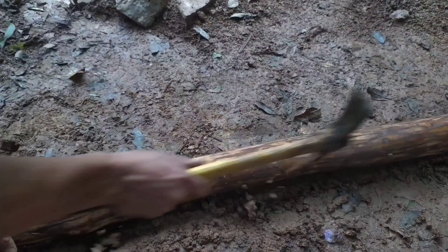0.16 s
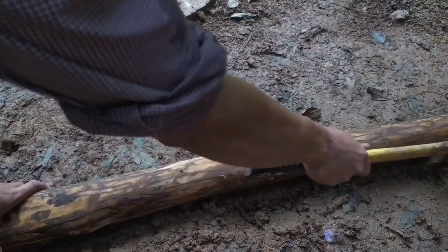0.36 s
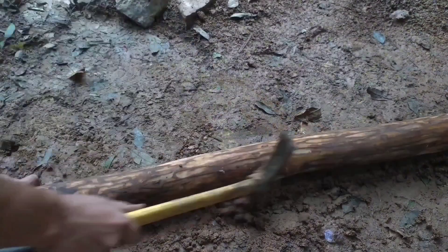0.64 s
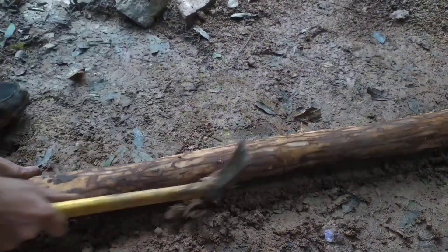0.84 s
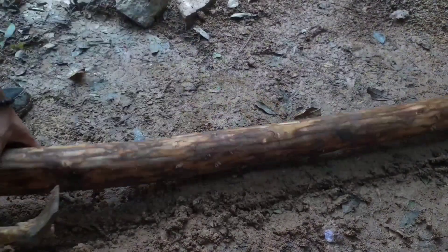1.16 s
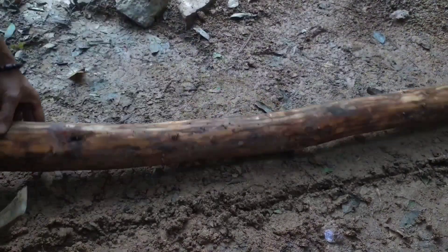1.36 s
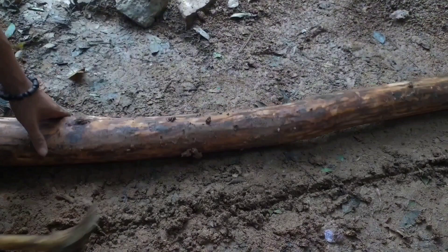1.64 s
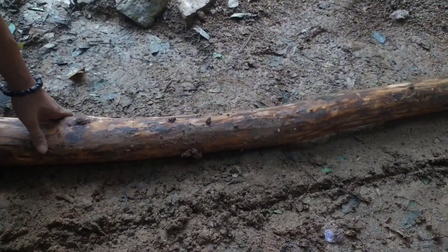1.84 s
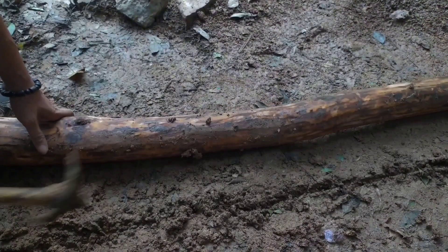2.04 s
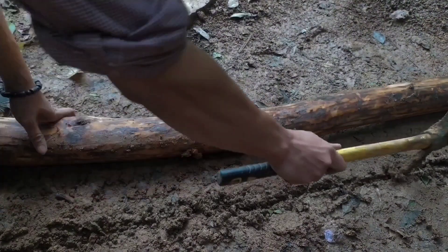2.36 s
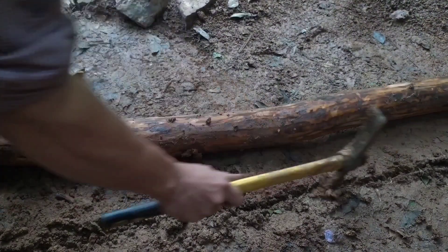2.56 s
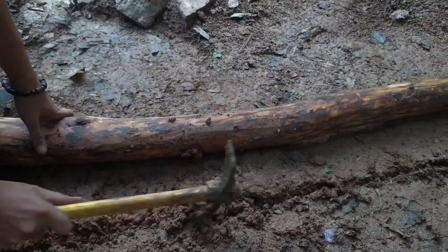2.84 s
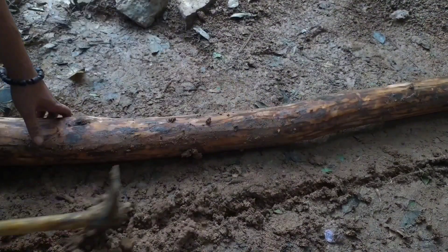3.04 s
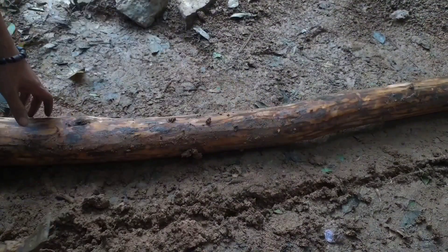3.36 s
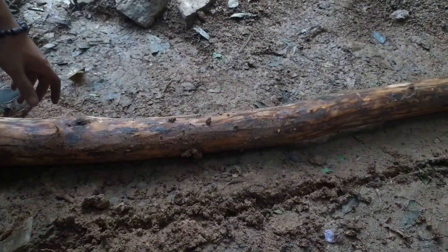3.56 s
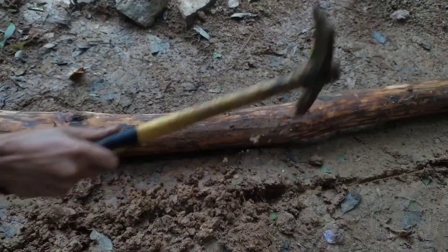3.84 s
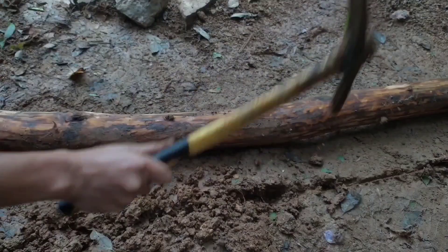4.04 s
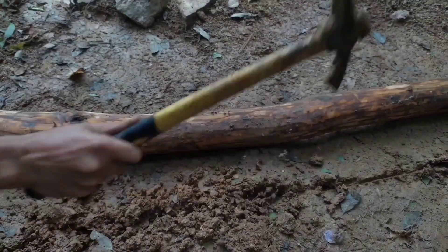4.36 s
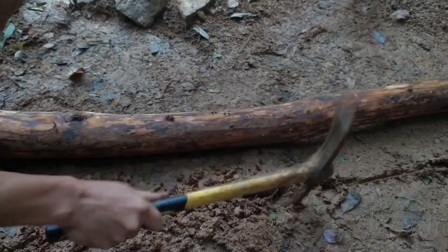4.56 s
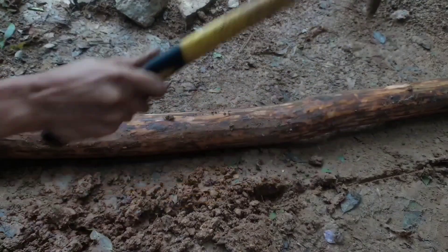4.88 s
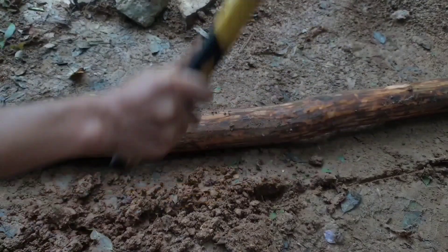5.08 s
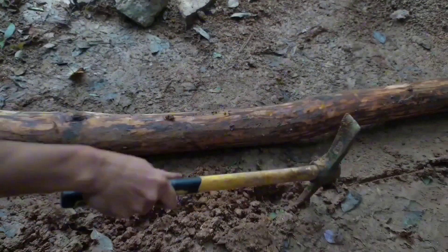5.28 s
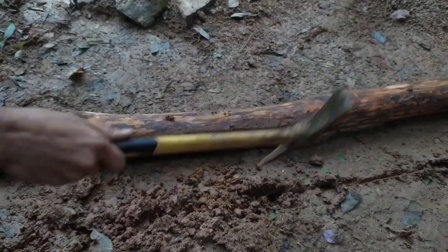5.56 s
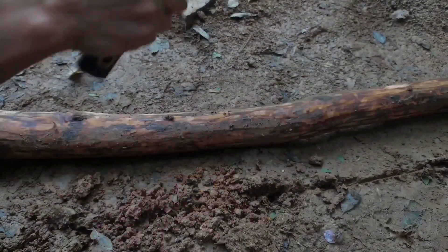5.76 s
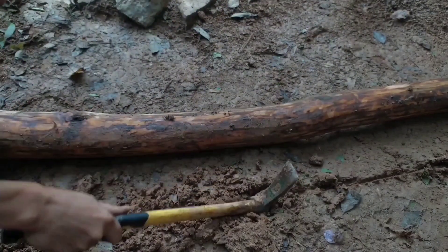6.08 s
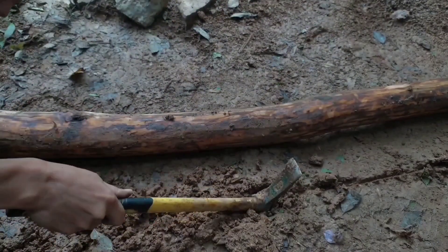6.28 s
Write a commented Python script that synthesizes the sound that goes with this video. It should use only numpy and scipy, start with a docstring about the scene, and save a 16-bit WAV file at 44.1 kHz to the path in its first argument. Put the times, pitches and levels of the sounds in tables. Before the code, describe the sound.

Under a soft cicada drone, a hoe rasps through loose earth and pebbles before striking the ground four times, close and hard.

```python
"""Cicadas drone throughout over a faint forest hush, their tymbals blurred into narrow bands.
For the first 3.6 s a small hoe scrapes loose soil along a log: grit rasps, sand hisses, pebbles click,
clods drop, and at 1.5 s the log settles. From 4.1 to 6 s the hoe chops four times into stony ground,
close by: each chop is a gritty crack and a thud, answered by a short, low boom from the surroundings.
One last faint scrape follows at 6.3 s."""
import sys
import numpy as np
from scipy import signal
from scipy.fft import rfft, irfft
from scipy.io import wavfile
from scipy.ndimage import uniform_filter1d

SR = 44100
rng = np.random.default_rng(int(sys.argv[2]) if len(sys.argv) > 2 else 0)


def log_audio(samples):
    """Write samples as a 16-bit WAV file to the path given in sys.argv[1]."""
    # one column per channel
    frames = np.atleast_2d(samples).T
    # limit to full scale, then quantise
    limited = np.clip(frames, -1, 1)
    pcm = np.round(limited * 32767).astype(np.int16)
    wavfile.write(sys.argv[1], SR, pcm)


N = 282681

# blade impacts, one or more per chop: start_s, edge_db, crunch_db, crunch_decay_s, thud_db,
# thud_pitch_ratio, boom_db, stone_hz, stone_db, left_right_db
IMPACTS = [(4.083, -9.5, -12.5, .002, -33, 1.3, -37, 2775, -15, -8),
           (4.096, -15, -10.5, 0.0012, -14, 1.3, -28, 2218, -18, -2),
           (4.1, -9.5, -15, 0.0022, -16, 1.4, -10.5, 1080, -12.5, 8),
           (4.5738, -5, -9, 0.002, -3, 1.0, -1, 1290, -5, 1),
           (5.1736, -2.5, -15.5, 0.0061, -4.5, .98, 2, 1996, -6.5, 3),
           (5.3448, -32, -36, 0.0044, -41.5, 0.82, -24, 2070, -34, -5),
           (6.0108, -3.5, -11.5, 0.0036, -13, 1, -20.5, 1560, -21, 7.5),
           (6.0220, -20, -21, 0.0013, -24, 0.92, -21, 1912, -25, -7.5),
           (6.026, -29.5, -10, 0.0011, -11.5, 1.0, -7, 2633, -22, -10)]
# stereo image of scrapes and bumps: freq_hz, left_right_db, left_lead_rad
SOIL_IMAGE = [(98.7, -14, 2), (450, -0.5, 0.5), (1250, -4.5, 1.6), (2000, -7, -1.5), (2820, -12.5, -5.5),
              (4750, 0, -1.5), (8820, -7, -2), (14400, 2.5, 3)]


def chops(crunch_lag_s=.0007, thud_lag_s=.0017, soil_give_s=.00044):
    """The edge ticks on grit, crunches through it, and the earth stops the head with a thud and a boom."""
    # spectra of steel meeting grit and of crushed grit: freq_hz, density_db
    edge_spectrum = [(1000, -20.5), (2500, -1.5), (4000, -1.5), (5400, -7.5), (6900, -2.5), (8400, 1),
                     (9600, -5.5), (11000, -15), (13000, -19.5), (14800, -17), (16000, -32)]
    crunch_spectrum = [(100, -14.5), (500, -4), (900, -7.5), (1600, 5), (2700, 0.5), (3400, -2.5),
                       (4200, -22), (5500, -16.5), (9000, -31.5), (16000, -39.5)]
    # packed earth: pitch_hz, level_db, t60_s
    earth_modes = [(149, -20.5, 0.073), (238.8, -8.5, .033), (342.4, -6.5, 0.029), (497, 5.5, 0.015),
                   (647, -8, 0.027), (800, -14, 0.042), (1360, -17.5, 0.0069)]
    # stereo image: freq_hz, left_right_db, left_lead_rad
    chop_image = [(100, -3, 0.5), (450, 1.5, 0.5), (1417, 0.5, 0.5), (2800, -4, 2), (4300, 0, 4),
                  (5700, -3, 4.5), (9000, -2, 9), (15000, -1, 8)]
    out, t = np.zeros((2, N)), np.arange(SR // 2) / SR
    for s, edge_db, crunch_db, decay_s, thud_db, ratio, boom_db, stone_hz, stone_db, side_db in IMPACTS:
        tick = amp(edge_db) * colour(burst(decay_s=.0013, rise_s=.00022), edge_spectrum)
        add(out, s, pan(side_db) * tick)
        crunch = amp(crunch_db) * colour(burst(decay_s, rise_s=.00055), crunch_spectrum)
        stone = ring(stone_hz, stone_db, t60_s=.021)
        add(out, s + crunch_lag_s, pan(side_db) * (crunch + stone))
        thud = sum(ring(hz * ratio, db + thud_db, t60_s) for hz, db, t60_s in earth_modes)
        add(out, s + thud_lag_s, -thud * (1 - np.exp(-t / soil_give_s)))
        add(out, s, amp(boom_db) * boom())
    return stereo(blade(out, ring_db=-22), chop_image)


def boom(size=22050):
    """The low, drooping answer of the surroundings to a blow on the ground."""
    # low resonances: pitch_hz, level_db, t60_s, delay_s, swell_s, left_right_db
    boom_modes = [(77, -33, .33, 0.006, 0.015, -13), (81, -22.5, 0.065, 0.0064, 0.0036, 3),
                  (142.4, 0.5, .075, 0.0066, 0.018, -3.5), (167, -46, 0.46, .01, .015, -1)]
    out, t = np.zeros((2, size)), np.arange(size) / SR
    for hz, db, t60_s, delay_s, swell_s, side_db in boom_modes:
        onset = 1 - np.exp(-(t / swell_s) ** 2)
        add(out, delay_s, pan(side_db) * ring(hz, db, t60_s, sag=.25) * onset)
    return out


def blade(x, ring_db):
    """Adds the faint ring of the steel to whatever touches it."""
    # steel blade: pitch_hz, level_db, t60_s
    steel_modes = [(1900, -39.5, 0.028), (3080, -39, 0.034), (3016, -24.5, .04), (6870, -32.5, 0.034),
                   (7300, -37.5, .03), (8500, -38.5, .05)]
    return x + amp(ring_db) * convolve(x, sum(ring(*mode) for mode in steel_modes))


def scraping(clod_lag_s=.0053):
    """Dragged or thrown crumbs: grit rasps, sand runs earlier and trickles on, clods tumble behind."""
    # strokes through loose soil: start_s, swell_s, settle_s, length_s, level_db,
    # clods_relative_db, sand_relative_db, hum_db
    strokes = [(0.0, 0.0056, 0.031, 0.17, -44, -2, 1.5, -42), (0.253, .14, 0.14, .2, -55, -7, 2.5, -61.5),
               (0.438, 0.089, 0.032, 0.14, -40, -10.5, 1, -54),
               (0.592, .011, 0.027, 0.048, -37.5, -18, 0.5, -57),
               (0.617, 0.046, 0.082, 0.15, -52, -2, -1.5, -51), (0.781, 0.14, 0.076, 0.31, -43, -2, 3, -47),
               (1.116, 0.03, 0.36, 0.33, -61, -6, 2.5, -73), (1.446, .01, 0.047, .11, -52, 1.5, 3.5, -49.5),
               (1.644, 0.044, 0.023, 0.12, -47, 1, 5.5, -54), (1.761, 0.02, 0.075, .15, -55, -8, 4.5, -59),
               (2.342, 0.011, 0.022, 0.11, -36.5, -12.5, -4, -53.5),
               (2.395, 0.087, 0.59, 0.8, -56, -11.5, 3, -61),
               (2.559, .018, 0.042, 0.085, -44, -5, -3.5, -49.5),
               (2.697, 0.032, 0.02, 0.053, -56.5, -1, -3, -52),
               (2.932, .075, 0.074, 0.11, -45.5, -4.5, -0.5, -54),
               (3.041, 0.059, 0.078, .15, -47, -4.5, 2.5, -49.5),
               (3.477, 0.064, 0.058, 0.12, -63.5, -8.5, 9, -68),
               (5.296, .05, .015, 0.069, -45.5, -2, 2, -42), (6.33, 0.049, 0.089, .2, -52, -7, -3, -67)]
    # spectra by crumb size: freq_hz, density_db
    grit_spectrum = [(300, -16), (800, -3.5), (1200, -3.5), (1800, 2.5), (2400, 0.5), (2950, 2),
                     (3600, -1.5), (5000, 3.5), (6200, 6.5), (9000, -23.5)]
    sand_spectrum = [(3000, -35.5), (5500, -1), (7000, 2), (8100, 3.5), (9300, -8), (10500, -17.5),
                     (12500, -24), (15000, -23), (16000, -44.5)]
    clod_spectrum = [(30, -15.5), (80, -12), (120, 2), (190, 6.5), (330, -3.5), (600, -6.5), (1000, -6.5),
                     (2000, -21.5)]
    clods, grit, sand, hum = np.zeros((4, N))
    for s, swell_s, settle_s, length_s, db, clods_db, sand_db, hum_db in strokes:
        grit += amp(db) * push(s, swell_s, settle_s, length_s)
        sand += amp(db + sand_db) * push(s, swell_s, settle_s * 1.1, length_s, power=1.1)
        clods += amp(db + clods_db) * push(s + clod_lag_s, swell_s, settle_s * 1.35, length_s)
        add(hum, s + swell_s, amp(hum_db) * ground_hum())
    crackle = grains(rate_per_s=850, spread_db=4.8, rub=.28) * clumps(depth_db=1.8)
    rasp = amp(3) * colour(crackle * (grit + debris() + spray()), grit_spectrum)
    hiss = amp(2.5) * colour(crackle * (sand + spray()), sand_spectrum)
    rumble = amp(1) * colour(crackle * (clods + debris()), clod_spectrum)
    soil = rasp + hiss + rumble + pebbles()
    return stereo(blade(soil[None], ring_db=-28.5) + hum, SOIL_IMAGE)


def push(start_s, swell_s, settle_s, length_s=1, power=1.3, lift_s=.0066):
    """Stroke envelope: builds as soil piles up, eases as it gives, ends as the blade lifts."""
    t = np.arange(N) / SR - start_s
    contact = .5 - .5 * np.tanh((t - length_s) / (2 * lift_s))
    return contact * np.clip(t / swell_s, 0, 1) ** power * np.exp(-np.maximum(t - swell_s, 0) / settle_s)


def grains(rate_per_s, spread_db, rub, bands=9):
    """Crumbs of each size crackle unevenly in their own octave, over a smooth rub."""
    octave = np.log2(np.clip(np.fft.rfftfreq(N, 1 / SR), 60, 15360) / 60)
    spectrum = 0
    for k in range(bands):
        strength = amp(spread_db * np.minimum(rng.exponential(1, N), 3.5))
        clicks = strength * rng.choice([-1, 1], N) * (rng.random(N) < rate_per_s / SR)
        spectrum += rfft(unit(clicks)) * np.cos(np.pi / 2 * np.clip(octave - k, -1, 1))
    return unit(unit(irfft(spectrum, N)) + rub * rng.standard_normal(N))


def clumps(depth_db):
    """Soil breaks away in lumps, so the crackle comes in flurries."""
    return unit(amp(depth_db * unit(uniform_filter1d(rng.standard_normal(N), size=300))))


def spray(relative_db=-35):
    """Envelope of crumbs bursting from each impact; follows the crunch level."""
    return sum(amp(relative_db + crunch_db) * push(s, swell_s=.012, settle_s=.016, power=.92)
               for s, _, crunch_db, *_ in IMPACTS)


def debris(relative_db=-56):
    """Envelope of thrown crumbs landing; a heavier blow throws more."""
    return sum(amp(relative_db + thud_db) * push(s, swell_s=.12, settle_s=.042, power=1.7)
               for s, _, _, _, thud_db, *_ in IMPACTS)


def pebbles():
    """Pebbles hit the blade with a bright tick and a duller clack."""
    # pebble hits: start_s, tick_db, clack_db
    hits = [(0.0167, -19.5, -26.5), (0.0248, -22, -25.5), (0.4924, -25, -43.5), (0.6065, -30, -25.5),
            (.651, -25.5, -39), (0.658, -22, -33.5), (0.865, -32.5, -41), (0.9059, -36.5, -29.5),
            (0.934, -40, -28), (1.266, -37, -51), (1.494, -38, -51.5), (1.657, -34.5, -59),
            (2.3452, -22.5, -34.5), (2.3758, -28, -32), (2.508, -29, -44), (2.5228, -37, -36),
            (2.6342, -30.5, -58), (2.691, -34, -32.5), (2.7235, -31.5, -33.5), (2.918, -35, -43.5),
            (3.026, -39.5, -36), (5.4291, -29, -37)]
    # spectra of a hit: freq_hz, density_db
    tick_spectrum = [(2000, -21.5), (4500, 0), (6500, -0.5), (8200, 9.5), (10500, -16), (15000, -11.5),
                     (16000, -71)]
    clack_spectrum = [(150, -14.5), (700, -11.5), (1700, -5.5), (2900, 6), (3700, 2), (6000, -10.5),
                      (12000, -43)]
    out = np.zeros(N)
    for s, tick_db, clack_db in hits:
        click = burst(decay_s=.002, rise_s=.00014)
        add(out, s, amp(tick_db) * colour(click, tick_spectrum))
        add(out, s, amp(clack_db) * colour(click, clack_spectrum))
    return out


def ground_hum(swell_s=.014, spread_db=2.5, size=22050):
    """The ground hums briefly under a stroke; each spot favours other tones."""
    # ground tones: pitch_hz, level_db, t60_s
    ground_modes = [(78, -2, 0.39), (107.5, -0.5, .2), (134.8, -5, 0.12), (192.3, 5, 0.072)]
    tones = sum(ring(hz, db + spread_db * rng.standard_normal(), t60_s) for hz, db, t60_s in ground_modes)
    return tones * (1 - np.exp(-np.arange(size) / SR / swell_s))


def bumps():
    """Clods drop with a dull pat; the rolled log settles softly."""
    # falling clods: start_s, level_db, pitch_hz
    clod_falls = [(.37, -39.5, 324), (0.475, -37.5, 343), (0.861, -32.5, 417), (3.317, -47, 647),
                  (4.247, -53, 550), (4.688, -44, 445), (4.868, -52, 522)]
    # log bumps: start_s, level_db
    log_bumps = [(1.459, -49), (1.478, -39)]
    # log on earth: pitch_hz, level_db, t60_s
    log_modes = [(47.27, -1.5, 0.1), (99.5, -4.5, 0.056), (166, -1.5, 0.096), (231, -6, .025),
                 (596, -4, .018)]
    out = np.zeros(N)
    for s, db, hz in clod_falls:
        add(out, s, ring(hz, db, t60_s=.026))
    for s, db in log_bumps:
        add(out, s, amp(db) * sum(ring(*mode) for mode in log_modes))
    return stereo(out[None], SOIL_IMAGE)


def surroundings(x, near_db=-7.5, far_db=-14, move_s=.06, patches=5):
    """Rough ground scatters sound, differently as the blade moves; far surfaces return a short tail."""
    # decay of near scatter and far echo: freq_hz, t60_s
    near_decay = [(100, 0.0023), (900, 0.0096), (2500, 0.012), (15000, 0.0077)]
    far_decay = [(100, 0.11), (500, 0.12), (1300, 0.11), (2600, 0.15), (8000, 0.24), (11000, .13),
                 (15000, .15)]
    place = np.arange(N) / SR / move_s
    near = 0
    for k in range(patches):
        crossfade = np.cos(np.pi / 2 * np.clip((place - k + 1) % patches - 1, -1, 1))
        near += convolve(x * crossfade, reflections(near_decay, build_s=.0011))
    far = convolve(x, pan(-.26) * reflections(far_decay, build_s=.0025))
    return amp(near_db) * near + amp(far_db) * far


def reflections(decay, build_s, rate_per_s=6000, size=16384):
    """Sparse echoes, different left and right, build up and die band by band."""
    taps = rng.standard_normal((2, size)) * (rng.random((2, size)) < rate_per_s / SR)
    hz, t, bands = signal.stft(taps, SR, nperseg=64)
    bands = bands * amp(-60 * t / lookup(decay, hz)[:, None])
    tail = signal.istft(bands, SR)[1][:, :size]
    tail *= 1 - np.exp(-(np.arange(size) / SR / build_s) ** 2)
    return tail / np.linalg.norm(tail, axis=1, keepdims=True)


def cicadas(fade_db_per_s=-.19):
    """Many distant tymbals blur into narrow bands, most throbbing at an unsteady rate."""
    # cicada groups: centre_hz, half_width_hz, level_db, pulse_hz, depth_ratio
    groups = [(4744, 320, -55.5, 36, 0.2), (6153, 283, -52, 34, 0.1), (6736, 120, -63.5, 710, 0.4),
              (7480, 350, -63.5, 141, 0), (8920, 820, -68.5, 63, .2)]
    hz, t, out = np.fft.rfftfreq(N, 1 / SR), np.arange(N) / SR, np.zeros((2, N))
    for centre_hz, half_width_hz, db, pulse_hz, depth in groups:
        passband = np.exp(-.5 * abs((hz - centre_hz) / half_width_hz) ** 3)
        buzz = irfft(rfft(rng.standard_normal((2, N))) * passband, N)
        drift = unit(uniform_filter1d(rng.standard_normal((2, N)), size=6000))
        throb = 1 + depth * np.sin(2 * np.pi * np.cumsum(pulse_hz * (1 + .15 * drift), axis=1) / SR)
        out += amp(db) * unit(buzz * throb)
    return out * amp(fade_db_per_s * t)


def forest_air(level_db=-59):
    """A faint, even hush."""
    # spectrum of the hush: freq_hz, density_db
    air_spectrum = [(15, 15), (35, 0.5), (70, -0.5), (180, -3.5), (450, -6.5), (1000, -12.5), (2800, -12.5),
                    (3800, -13.5), (8000, -10.5), (11000, -21.5), (16000, -21.5)]
    # its balance: freq_hz, left_right_db
    air_balance = [(60, -1), (400, -1.5), (1300, -4), (2400, -5.5), (4400, -2), (15000, 0)]
    hz = np.fft.rfftfreq(N, 1 / SR)
    gain = amp(lookup(air_spectrum, hz)) * pan(lookup(air_balance, hz))
    return amp(level_db) * unit(irfft(rfft(rng.standard_normal((2, N))) * gain, N))


def ring(hz, db, t60_s, sag=0, relax_s=.025, size=22050):
    """One dying mode; with sag it starts sharp and sinks as pressed soil relaxes."""
    t = np.arange(size) / SR
    cycles = hz * (t + sag * relax_s * (1 - np.exp(-t / relax_s)))
    return amp(db - 60 * t / t60_s) * np.sin(2 * np.pi * cycles)


def burst(decay_s, rise_s, size=22050):
    """A clump of tiny fractures: noise that swells fast and dies away."""
    t = np.arange(size) / SR
    shape = (1 - np.exp(-(t / rise_s) ** 2)) * np.exp(-t / decay_s)
    shape /= shape.max()
    return unit(shape * rng.standard_normal(size)) * np.sqrt(np.mean(shape ** 2))


def stereo(x, image, in_phase_hz=60):
    """Left-right level and phase differences; the deepest bass stays in phase."""
    hz = np.fft.rfftfreq(2 * N, 1 / SR)
    lead_rad = lookup(image, hz, column=2) * np.tanh(hz / in_phase_hz)
    gain = pan(lookup(image, hz)) * np.exp(1j * np.array([[.5], [-.5]]) * lead_rad)
    return irfft(rfft(x, 2 * N) * gain)[:, :N]


def colour(x, spectrum, size=4096):
    """Minimum-phase filter of unit energy."""
    gain = unit(amp(lookup(spectrum, abs(np.fft.fftfreq(size, 1 / SR)))))
    response = np.fft.ifft(np.exp(np.conj(signal.hilbert(np.log(gain))))).real
    return convolve(x, response[:size // 2])[0]


def convolve(x, response):
    """Causal convolution, as long as the input."""
    return signal.fftconvolve(np.atleast_2d(x), np.atleast_2d(response), axes=1)[:, :x.shape[-1]]


def lookup(table, hz, column=1):
    """Interpolates a column over log frequency."""
    columns = np.transpose(table)
    return np.interp(np.log(hz + 1), np.log(columns[0] + 1), columns[column])


def add(mix, start_s, sound):
    """Mixes a sound in place."""
    part = mix[..., max(round(start_s * SR), 0):][..., :sound.shape[-1]]
    part += sound[..., :part.shape[-1]]


def pan(db):
    """Left and right gains for a level difference."""
    return amp(np.array([[.5], [-.5]]) * db)


def amp(db):
    """Decibels to gain."""
    return 10 ** (np.asarray(db) / 20)


def unit(x):
    """Scales to rms 1."""
    return x / np.sqrt(np.mean(x ** 2) + 1e-20)


def scene():
    """Hoe work in front, its echo, the forest behind."""
    work = chops() + scraping() + bumps()
    return work + surroundings(work) + cicadas() + forest_air()


def record(dry, threshold_db=-14, recovery_db_per_s=28, squeeze=.24, cutoff_hz=15900):
    """Gain control ducks at loud chops and recovers; peaks round off; a low-pass limits the band."""
    power_db = 10 * np.log10(abs(uniform_filter1d((dry ** 2).mean(0), size=130)) + 1e-12)
    fall_db = np.arange(N) * recovery_db_per_s / SR  # release of the detector, ahead of squeeze
    over_db = np.maximum.accumulate(np.maximum(power_db - threshold_db, 0) + fall_db) - fall_db
    ducked = dry * amp(-squeeze * uniform_filter1d(over_db, size=90))
    rounded = ducked / (1 + ducked ** 6) ** (1 / 6)
    lowpass = signal.firwin(255, cutoff_hz, window=("kaiser", 9), fs=SR)
    return signal.oaconvolve(rounded, lowpass[None], "same")


dry = scene()
out = record(dry)
log_audio(out)
```